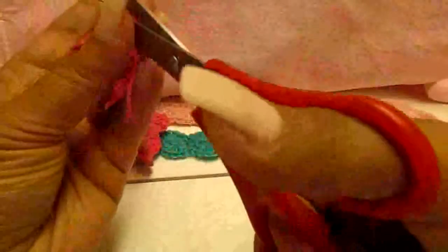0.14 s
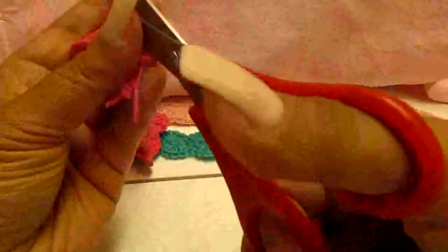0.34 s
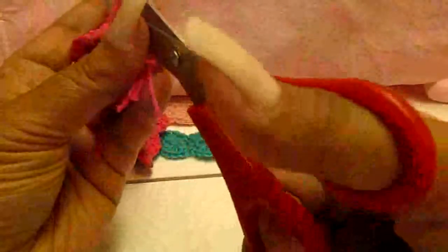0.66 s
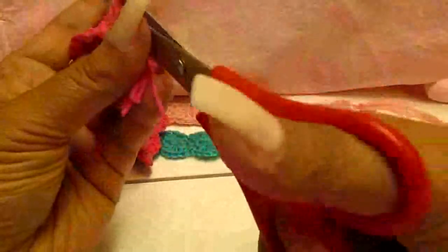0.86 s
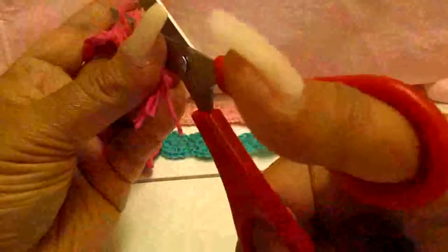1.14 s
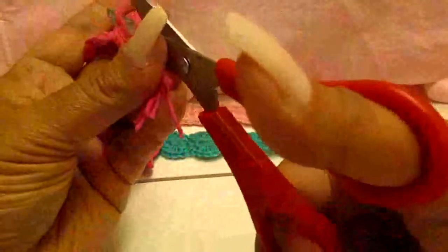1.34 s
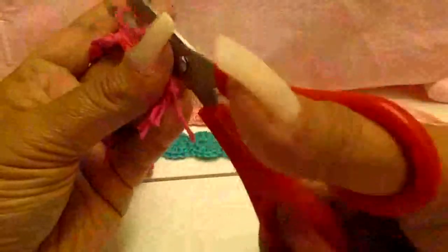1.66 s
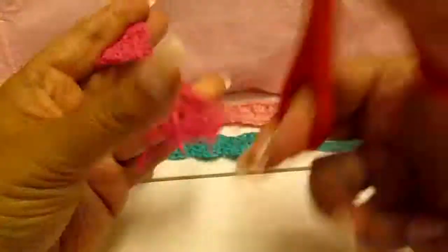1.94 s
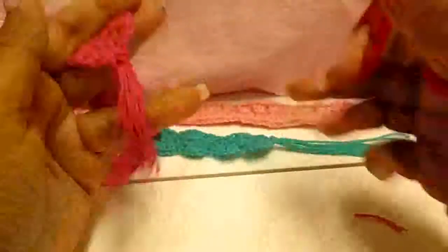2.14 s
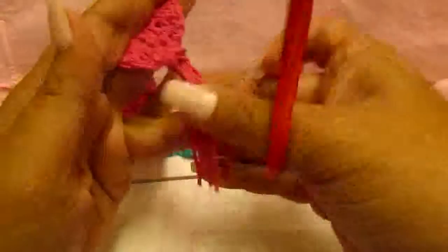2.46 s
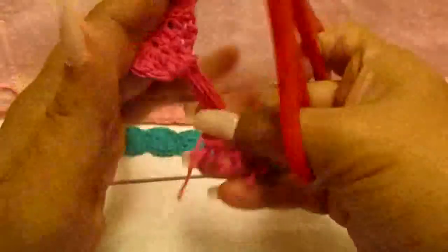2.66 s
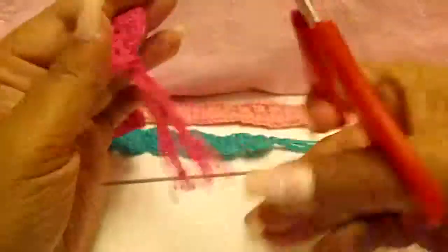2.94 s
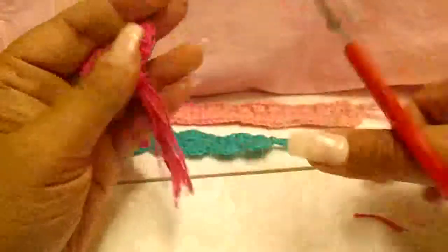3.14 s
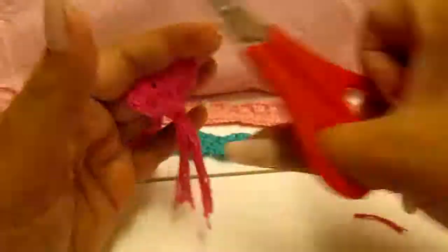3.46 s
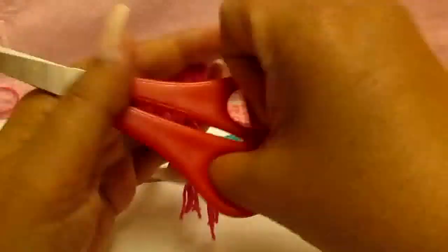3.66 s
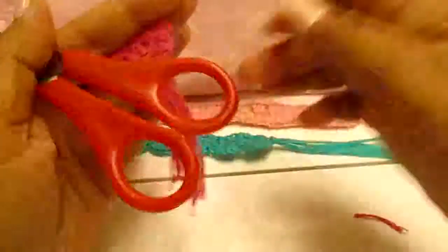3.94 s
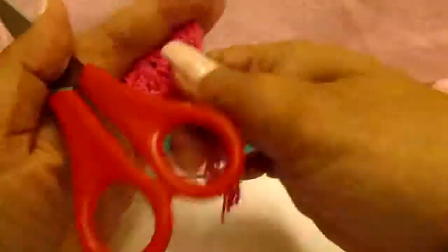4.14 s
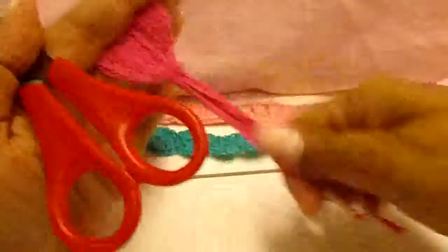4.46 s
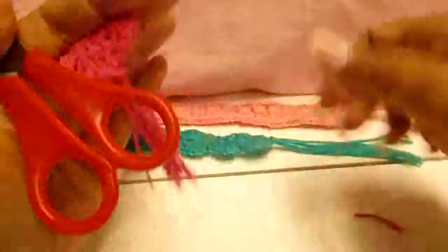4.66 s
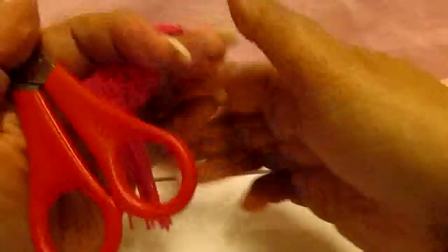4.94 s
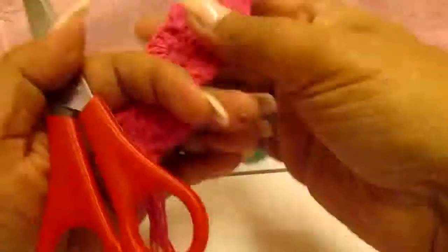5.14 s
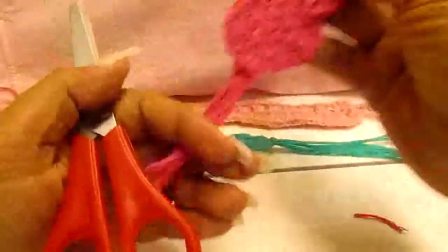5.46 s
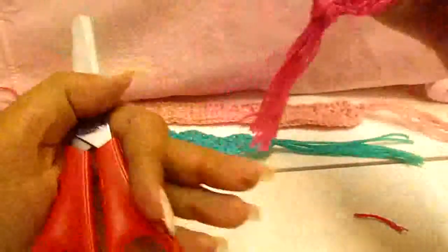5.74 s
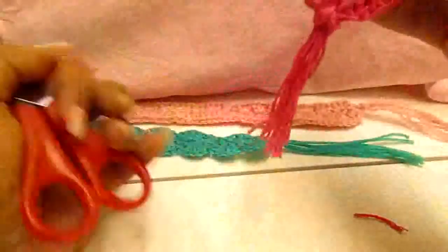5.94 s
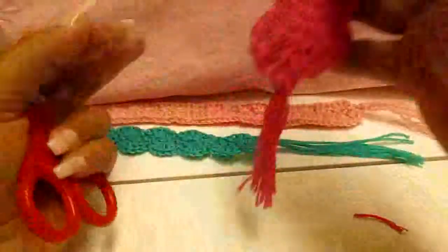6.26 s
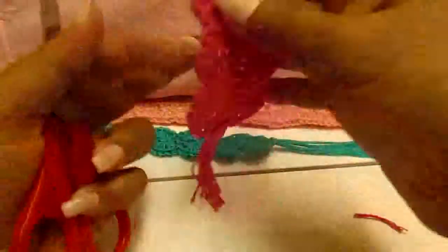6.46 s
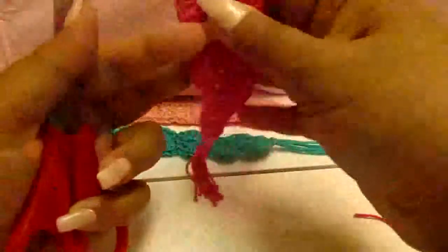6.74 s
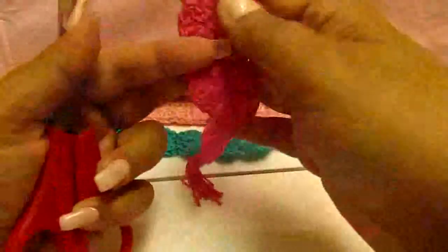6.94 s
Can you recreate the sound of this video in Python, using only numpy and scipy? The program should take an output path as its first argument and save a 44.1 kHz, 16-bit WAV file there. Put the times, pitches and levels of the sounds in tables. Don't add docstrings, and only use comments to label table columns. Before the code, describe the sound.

In a quiet room with a low fan hum, yarn is snipped with gritty metallic rasps, followed by clicks, soft rubbing and dull table knocks.

```python
import sys
import numpy as np
from scipy import signal
from scipy.fft import rfft, irfft, next_fast_len
from scipy.io import wavfile
from scipy.ndimage import uniform_filter1d, map_coordinates

SR = 44100
rng = np.random.default_rng(int(sys.argv[2]) if len(sys.argv) > 2 else 0)


def attenuation_scalar(level_db):
    decades = np.asarray(level_db, float) / 20
    return 10 ** decades


def inscribe(sig):
    pcm = np.round(np.clip(np.atleast_2d(sig).T, -1, 1) * 32767)
    wavfile.write(sys.argv[1], SR, pcm.astype(np.int16))


N = 313551


def unit(x):
    return x / np.sqrt(np.mean(x ** 2) + 1e-20)


def along(points, hz):
    f, value = np.transpose(points)
    return np.interp(np.log(hz + 1), np.log(f + 1), value)


def wobble(rate):
    knots = rng.standard_normal(int(N * rate / SR) + 4)
    return map_coordinates(knots, [np.arange(N) * rate / SR])


def filtered(x, response):
    m = next_fast_len(N + SR // 2)
    return irfft(rfft(x, m) * response(np.fft.rfftfreq(m, 1 / SR)), m)[..., :N]


def modes(table):
    def response(f):
        total = 0
        for k, (centre, width, db) in enumerate(table):
            resonance = 1j * f * width / (centre * centre - f * f + 1j * f * width)
            total = total + (-1) ** k * attenuation_scalar(db) * resonance
        return total
    return response


def grit(spread_db, rate):
    size_db = spread_db * rng.standard_normal(N) + spread_db * wobble(rate)
    return unit(rng.standard_normal(N) * attenuation_scalar(size_db))


def swell(s, hold, db, rise, fall):
    t = np.arange(N) / SR - s
    slope = np.minimum(t / rise, (hold - t) / fall)
    return attenuation_scalar(db + 20 * np.minimum(slope, 0))


# f/Hz, level/dB per Hz
ROOM_COLOUR = [(12, -44), (20, -6.5), (54, -10.5), (88, -2), (217, -9.5), (254, -9), (486, -18),
               (539, -19.5), (837, -21), (1090, -18), (1240, -23), (1560, -20.5), (1690, -26), (6840, -33),
               (9840, -41.5), (12800, -80.5), (21600, -120)]
# f/Hz, width/Hz, level/dB, growth with load [dB per dB]
FAN_BANDS = [(93.4, 39, -60, .7), (272.2, 83, -61.5, 0.98), (1551, 128, -65.5, .25)]
# t/s, level/dB
FAN_LOAD = [(0, 0.5), (1.2, .1), (1.7, -1.5), (4.8, -0.6), (5.4, -1), (6.2, 7.5), (6.75, 8), (7.11, 7.5)]


def room():
    hiss = unit(filtered(rng.standard_normal(N), lambda f: attenuation_scalar(along(ROOM_COLOUR, f))))
    out = attenuation_scalar(-52 + 0.45 * wobble(5.3)) * hiss
    load_db = np.interp(np.arange(N) / SR, *np.transpose(FAN_LOAD))
    for hz, width, db, growth in FAN_BANDS:
        band = modes([(hz, width, 0)])
        rush = unit(filtered(rng.standard_normal(N), lambda f: band(f) ** 2))
        out += attenuation_scalar(db + growth * load_db + 1.37 * wobble(9) + 0.9 * wobble(1.486)) * rush
    return out


# t/s, peak level/dB, bounce delay/s, bounce share of the blow
SNAPS = [
    (.1970, -30.5, 0.00049, 0.19),
    (1.1921, -26, .0005, 0.2),
    (3.516, -14, .0004, 0.23),
    (3.606, -24.5, .0006, 0.24),
    (3.6400, -22, 0.00091, 0.38),
    (4.0141, -21.5, .0009, .25),
]
# f/Hz, width/Hz, level/dB
SNAP_RINGS = [
    [(1060, 600, 8), (1970, 930, 3.5), (2800, 520, -5)],
    [(1940, 740, -12), (2920, 600, -6), (3940, 780, -3), (7050, 550, -7.5), (8560, 790, -13)],
    [(1480, 1900, -7), (2420, 470, 2), (3010, 350, 1.5), (4300, 1500, -7), (6290, 470, 3), (7300, 350, -7),
     (8340, 290, -2.5), (8950, 240, -13.5)],
    [(1480, 500, -7.5), (3140, 400, -4), (6360, 980, -9.5), (9100, 280, -1.5)],
    [(2250, 450, 1), (3000, 460, 0), (5660, 700, -3), (6800, 610, -5), (8900, 700, -10.5)],
    [(1400, 360, -6.5), (2530, 320, 0), (3300, 660, 1), (4160, 960, 0.5), (5660, 210, -0.5),
     (7360, 380, -7.5), (8950, 400, -15)],
]


def snaps():
    out, t = np.zeros(N + SR), np.arange(SR // 20) / SR
    draws = rng.standard_normal((len(SNAPS), 2, len(t)))
    for (s, db, delay, share), table, (chatter, smear) in zip(SNAPS, SNAP_RINGS, draws):
        push = 0.089 * chatter * attenuation_scalar(-60 * t / 0.01)
        push += 0.0038 * chatter * attenuation_scalar(-60 * t / 0.37)
        push[0] = 1
        push[round(delay * SR)] = share
        blow = irfft(rfft(push) * modes(table)(np.fft.rfftfreq(len(t), 1 / SR)), len(t))
        out[round(s * SR):][:len(t)] += attenuation_scalar(db) * blow / np.abs(blow).max()
        haze = unit(np.convolve(smear, blow)[:len(t)]) * 0.55 * (t < 0.012)
        out[round((s - 0.006) * SR):][:len(t)] += attenuation_scalar(db - 29) * haze
    return filtered(out[:N], lambda f: (1j * f / (800 + 1j * f)) ** 2)


# t/s at full speed, hold/s, level/dB, rise/s, upper band level/dB
STROKES = [(0.252, .003, -63, .04, 0.5), (.41, .003, -61.5, .09, 2), (1.2, .035, -58, .004, -1.5),
           (1.719, .022, -63.5, 0.073, -2), (2.842, .003, -59, .11, -1.5), (2.874, 0.031, -62, .02, -3),
           (3.069, 0.07, -53.5, 0.072, -0.5), (3.418, .05, -60.5, .05, -2.5), (4.021, 0.036, -58, .004, -3),
           (4.551, 0.068, -48.5, 0.11, -3.5), (4.633, 0.068, -48.5, 0.034, -8.5),
           (4.715, 0.019, -47, .02, -3.5), (5.184, 0.018, -64, 0.054, -2), (5.304, .03, -62.5, .055, -1.5),
           (5.494, .12, -59, 0.17, -1), (5.64, .015, -56.5, 0.026, -1.5), (5.684, 0.16, -65.5, 0.033, 3),
           (6.98, 0.0044, -65, .16, -3), (7.084, .003, -63, 0.11, -.5)]
# f/Hz, level/dB
YARN_LOW = [(1500, -21.5), (2650, -16), (3100, -0.5), (3700, -6), (5100, -0.5), (5700, -4.5), (8000, -37)]
# f/Hz, level/dB
YARN_HIGH = [(4500, -34.5), (6200, -6), (6800, -6), (7500, -6), (7900, -7), (9000, -11.5), (10000, -17)]


def strokes():
    def fizz(colour):
        return unit(filtered(grit(spread_db=1.5, rate=150), lambda f: attenuation_scalar(along(colour, f))))
    low, high = fizz(YARN_LOW), fizz(YARN_HIGH)
    shares = np.clip(attenuation_scalar([row[-1] for row in STROKES]), 0, 0.98)
    levels = np.array([swell(s, hold, db, rise, fall=0.015) for s, hold, db, rise, _ in STROKES])
    return np.sqrt(1 - shares ** 2) @ levels * low + shares @ levels * high


# t/s, peak level/dB, low mode f/Hz, high mode f/Hz, high mode level/dB
TICKS = [(0.4224, -41.5, 2800, 4500, -3), (.5116, -51.5, 2500, 4000, -13), (0.587, -45, 3000, 4500, -5),
         (1.4049, -35, 3430, 6900, -4), (1.8015, -38.5, 3800, 6900, -5.5), (2.6106, -40, 2500, 6900, 4),
         (2.633, -38, 3770, 6200, 10), (2.635, -40, 3800, 6200, 5), (2.6375, -44, 3800, 6500, 14),
         (2.6678, -38, 5200, 6800, 6), (2.8717, -40, 3000, 6300, -3), (3.329, -37, 2520, 6600, 9),
         (3.3317, -38.5, 4850, 7460, 0.5), (3.3685, -41, 3000, 6050, -3), (3.4228, -40, 2500, 5900, 5.5),
         (3.434, -40, 4000, 6000, 7), (3.447, -35, 4070, 5900, 9), (3.6364, -43, 2310, 6540, -6.5),
         (4.4634, -46, 2200, 3500, -6), (5.274, -37.5, 1790, 2490, -18)]


def ticks():
    out, t = np.zeros(N + SR), np.arange(SR // 40) / SR
    t60 = 0.0048
    chatters = rng.standard_normal((len(TICKS), len(t)))
    for (s, db, low_hz, high_hz, high_db), chatter in zip(TICKS, chatters):
        ring = np.sin(2 * np.pi * low_hz * t) + attenuation_scalar(high_db) * np.sin(2 * np.pi * high_hz * t)
        ring *= attenuation_scalar(-60 * t / (0.36 * t60)) * (1 - np.exp(-t / 0.0001))
        push = 0.15 * chatter * attenuation_scalar(-60 * t / (2.2 * t60))
        push[0] = 1
        blow = np.convolve(push, ring)[:len(t)]
        out[round(s * SR):][:len(t)] += attenuation_scalar(db + 1) * blow / np.abs(blow).max()
    return filtered(out[:N], lambda f: 1j * f / (700 + 1j * f))


# t/s at full force, hold/s, level/dB, rise/s
CUTS = [
    (0.824, 0.15, -60, .2),
    (1.199, .012, -58, .004),
    (1.412, .12, -49.5, .004),
    (1.55, .025, -55, .02),
    (1.59, .015, -50, .02),
    (1.838, 0.082, -46, 0.042),
]
# t/s, peak level/dB
BITES = [(0.83, -41), (0.872, -40), (0.905, -38.5), (1.4344, -42), (1.511, -38.5), (1.521, -30.5),
         (1.588, -51), (1.5993, -36), (1.831, -43), (1.863, -48), (1.872, -30.5), (1.892, -37),
         (1.9125, -32.5)]
# f/Hz, width/Hz, level/dB
BLADE_RINGS = [(2320, 480, -7), (3340, 540, -5.5), (3830, 295, 0), (4430, 410, -7.5), (5740, 700, -12.5),
               (6200, 350, -9.5), (7030, 250, -4), (8440, 650, -14), (9900, 550, -17.5)]


def shearing():
    t = np.arange(N) / SR
    force = sum(swell(s, hold, db - 4, rise, fall=0.033) for s, hold, db, rise in CUTS)
    bite_s = 0.0051
    for s, db in BITES:
        near = slice(int((s - 0.03) * SR), int((s + 0.05) * SR))
        force[near] += attenuation_scalar(db - 14) * np.exp(-((t[near] - s - bite_s / 2) / bite_s) ** 2)
    grind = filtered(grit(spread_db=2.8, rate=400), modes(BLADE_RINGS))
    steady = np.sqrt(np.abs(uniform_filter1d(grind ** 2, size=600)))
    return force * grind / steady


# t/s, peak level/dB, settled f/Hz, rattle level/dB
KNOCKS = [(1.918, -40, 79.5, -14), (2.1507, -37.5, 81.5, -5), (2.232, -35, 77, -13.5),
          (3.3951, -29.5, 98.5, -21), (3.521, -23, 97.3, -14.5), (3.7982, -37, 92, -21),
          (4.965, -37.5, 92, -23), (4.993, -27.5, 97.4, -19.5), (5.4505, -30.5, 85, -31),
          (5.514, -42, 95, -26), (5.7109, -35.5, 94, -26), (5.7851, -38.5, 93, -21),
          (6.6828, -26.5, 99.4, -24), (6.828, -46, 129, -12)]


def knocks():
    out, t = np.zeros(N + SR), np.arange(SR // 3) / SR
    rattle = unit(filtered(rng.standard_normal(N), modes([(293, 83, 5.5), (440, 220, -4)])))
    fade = 0.81 * np.exp(-(5 * t / 0.12) ** 2) + 0.14 * attenuation_scalar(-60 * t / 0.33)
    envelope = (1 - np.exp(-t / 0.0024)) * fade
    first_pitch = 3.07
    for s, db, hz, rattle_db in KNOCKS:
        start = round(s * SR)
        cycles = np.cumsum(hz * (1 + (first_pitch - 1) * np.exp(-t / 0.0035))) / SR
        body = np.sin(2 * np.pi * cycles)
        body += 0.19 * attenuation_scalar(-60 * t / 0.42) * np.sin(2 * np.pi * 1.88 * cycles)
        body += attenuation_scalar(rattle_db - 60 * t / 0.44) * rattle[start - len(t):][:len(t)]
        out[start:][:len(t)] += attenuation_scalar(db + 1) * envelope * body
    return out[:N]


# f/Hz, share missing [0-1]
MISSING = [(4000, 0.022), (6000, .03), (8000, 0.018), (9300, 0.31), (10000, 0.7)]
# f/Hz, width/Hz
GAP = (7880, 62)


def thin(x):
    hz, t, z = signal.stft(x, SR, nperseg=1024)
    lots = rng.random((len(hz) // 2 + 1, len(t) // 5 + 1))
    lots = np.repeat(np.repeat(lots, 2, 0), 5, 1)[:len(hz), :len(t)]
    x = signal.istft(z * (lots > along(MISSING, hz)[:, None]), SR, nperseg=1024)[1][:N]
    gap_hz, width = GAP
    return filtered(x, lambda f: 1 - 0.95 * np.exp(-((f - gap_hz) / width) ** 2))


def scene():
    steady = thin(shearing() + strokes() + room())
    return (steady + ticks() + snaps() + knocks())[None]


def loudest(db, start, end):
    return np.max([np.roll(db, -k) for k in range(start, end)], 0)


def starve(x):
    hz, t, z = signal.stft(x, SR, nperseg=256)
    lots = rng.random((len(hz) // 4 + 1, len(t) // 4 + 1))
    lots = np.repeat(np.repeat(lots, 4, 0), 4, 1)[:len(hz), :len(t)]

    def level_over_usual(band):
        db = 10 * np.log10(np.sum(np.abs(z[0, band]) ** 2, 0) + 1e-20)
        return db - np.median(db)
    treble_db, bass_db = level_over_usual(hz > 3500), level_over_usual(hz < 600)
    sharp_db = np.maximum(loudest(treble_db, 0, 13), loudest(treble_db, -14, 0) - 14)
    thud_db = uniform_filter1d(loudest(bass_db, -10, 6), size=5) - 3
    lack = 0.056 * np.maximum(sharp_db - 13, 0) + 0.02 * np.maximum(thud_db - 7, 0)
    quiet = loudest(treble_db, -2, 3) < np.maximum(9, sharp_db - 14)
    octaves = np.log2(hz[:, None] / 6500 + 1e-3)
    share = (lack > 0) * quiet * (lack + 0.36 * octaves)
    lost = (hz[:, None] > 2000) & (lots < share)
    return signal.istft(z * ~lost, SR, nperseg=256)[1][:, :N]


def top_cut(x):
    return signal.sosfilt(signal.butter(12, 9990, fs=SR, output="sos"), x)


def record(dry):
    x = filtered(starve(dry), lambda f: 1 / (1 + (f / 10000) ** 150))
    mix = x + attenuation_scalar(-101) * rng.standard_normal(dry.shape)
    return top_cut(mix)


dry = scene()
out = record(dry)
inscribe(out)
```